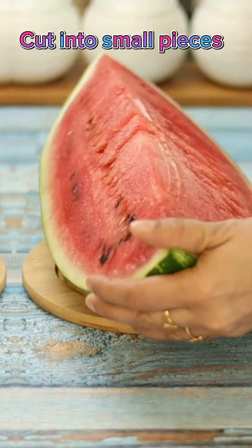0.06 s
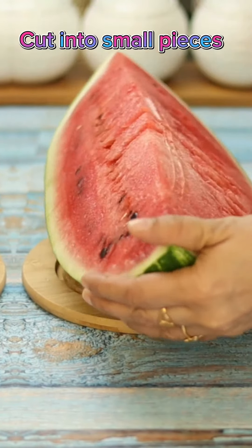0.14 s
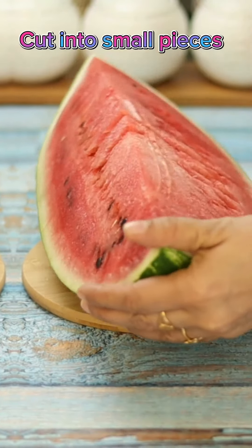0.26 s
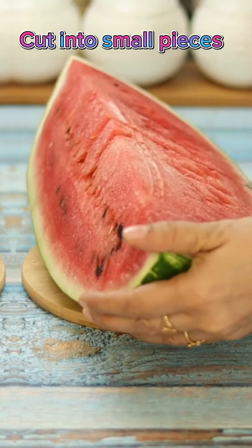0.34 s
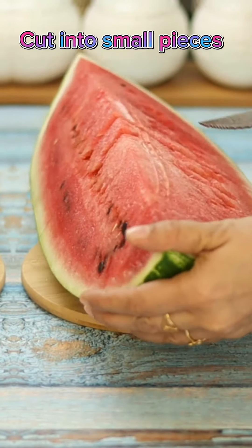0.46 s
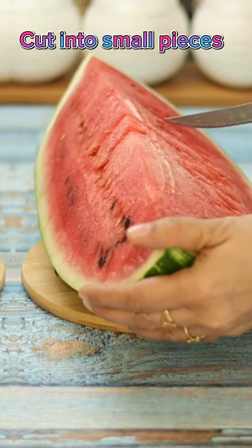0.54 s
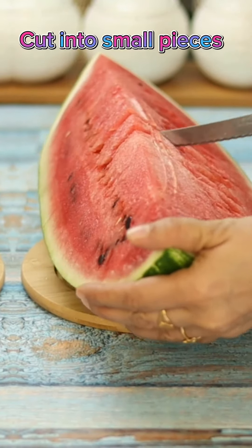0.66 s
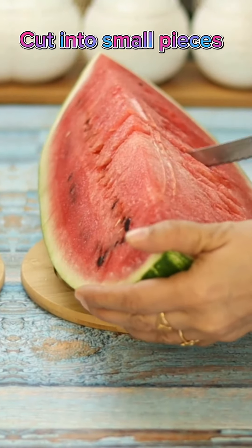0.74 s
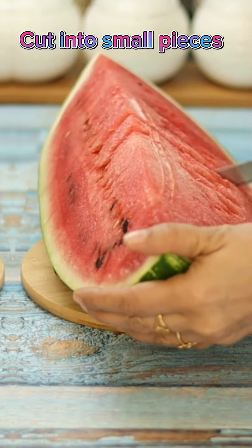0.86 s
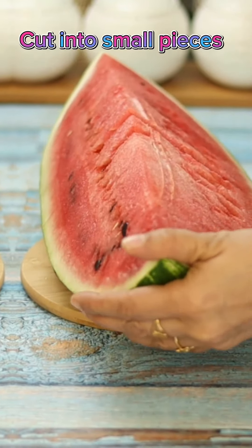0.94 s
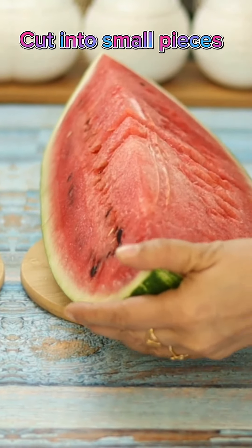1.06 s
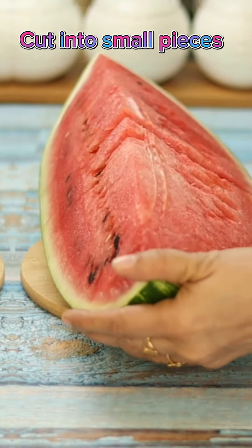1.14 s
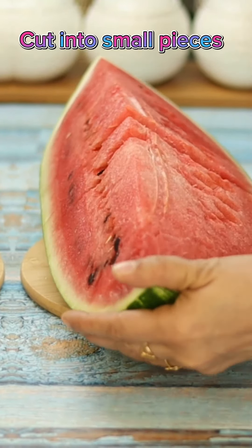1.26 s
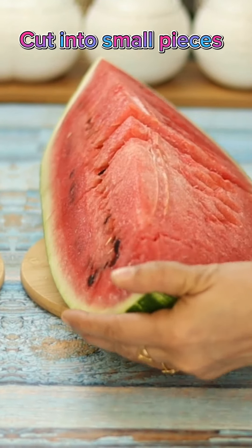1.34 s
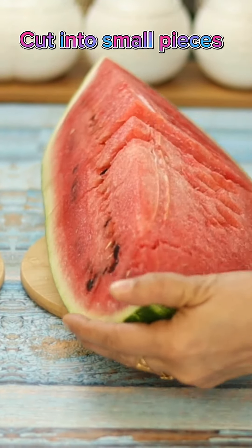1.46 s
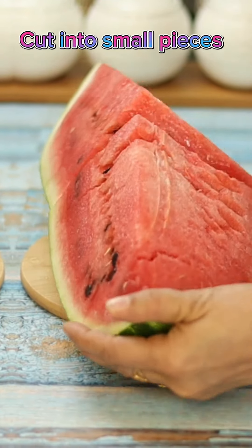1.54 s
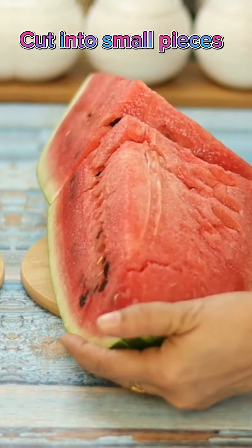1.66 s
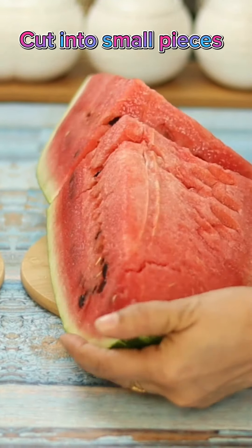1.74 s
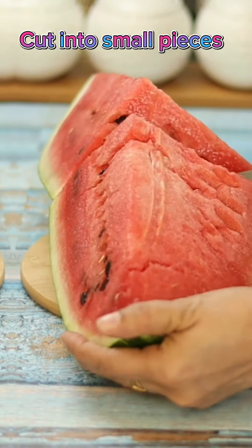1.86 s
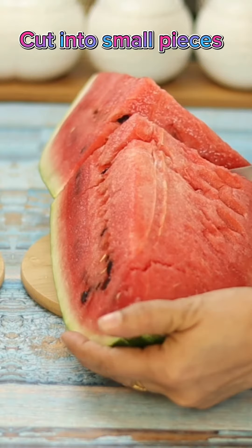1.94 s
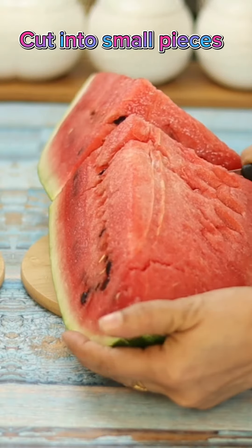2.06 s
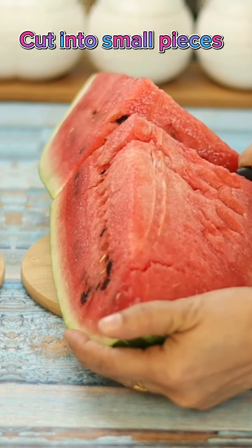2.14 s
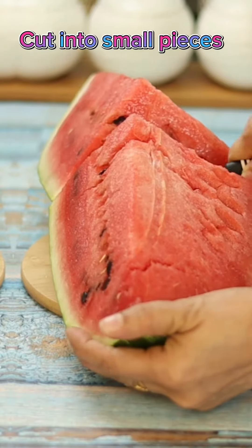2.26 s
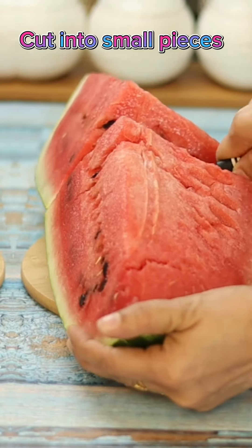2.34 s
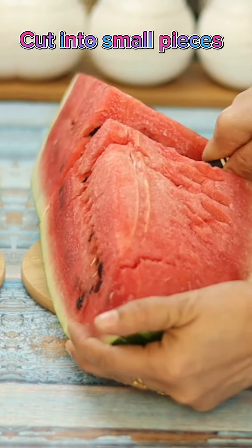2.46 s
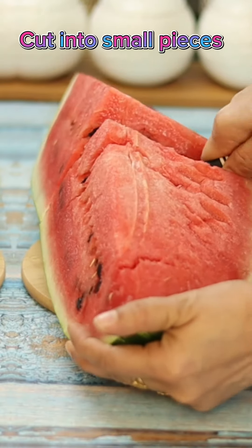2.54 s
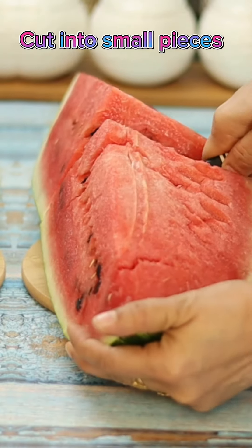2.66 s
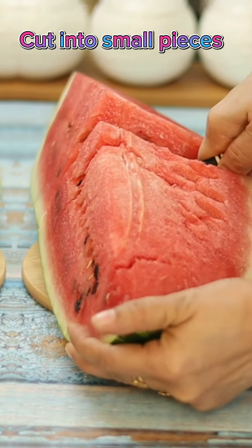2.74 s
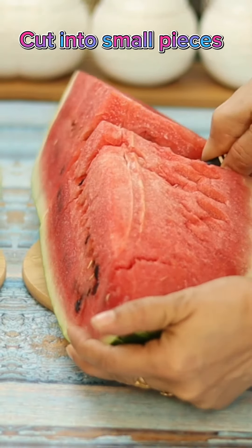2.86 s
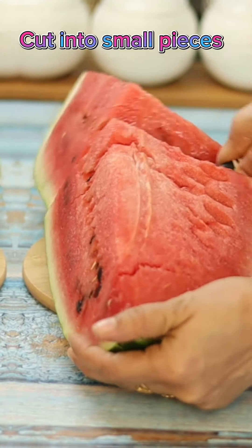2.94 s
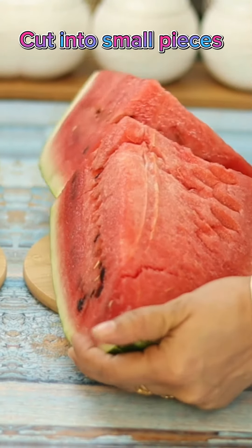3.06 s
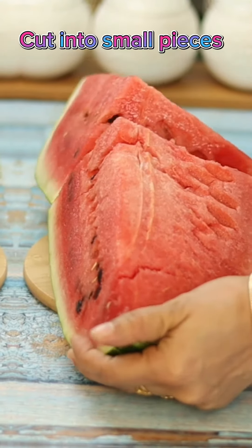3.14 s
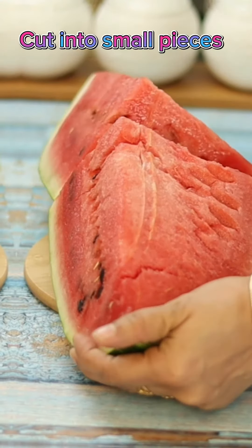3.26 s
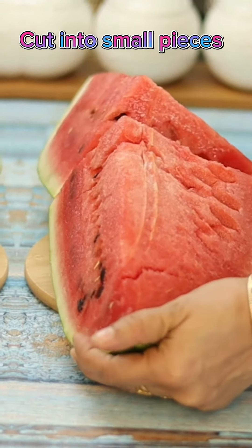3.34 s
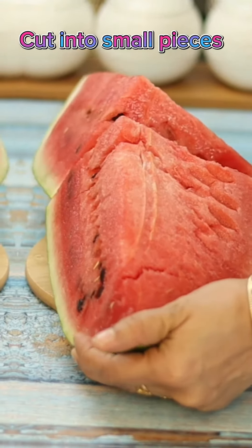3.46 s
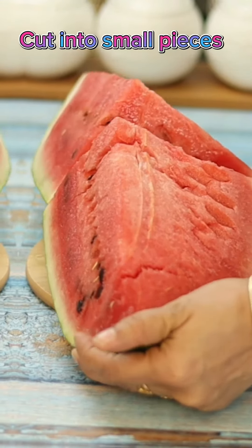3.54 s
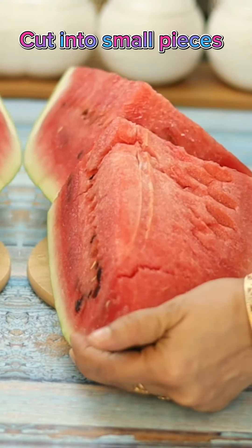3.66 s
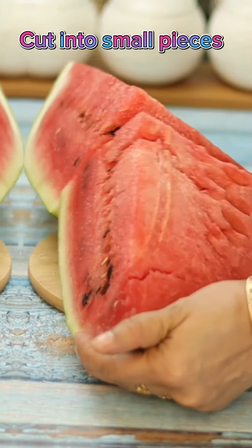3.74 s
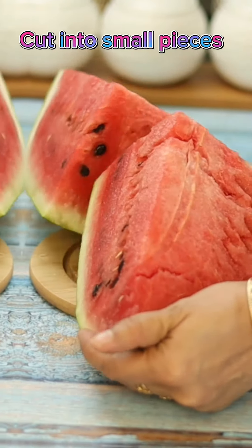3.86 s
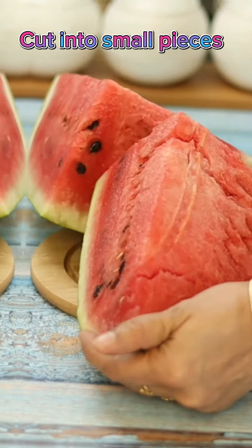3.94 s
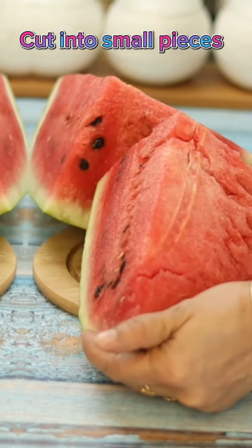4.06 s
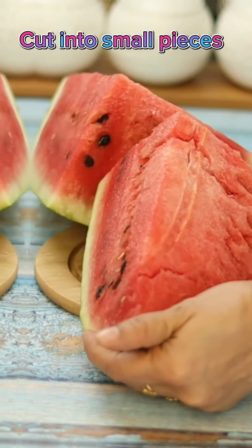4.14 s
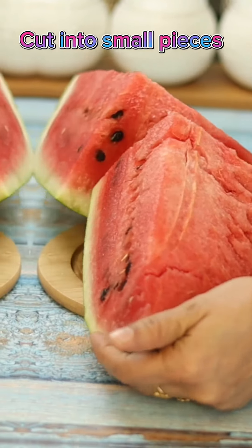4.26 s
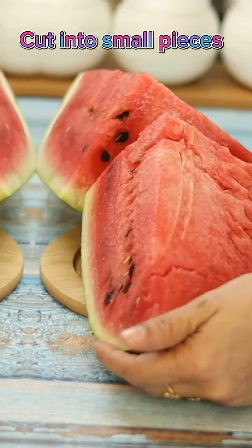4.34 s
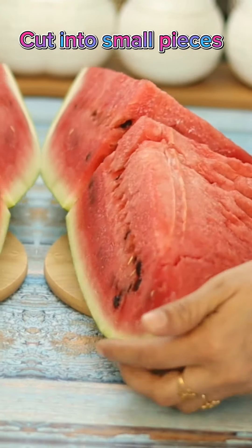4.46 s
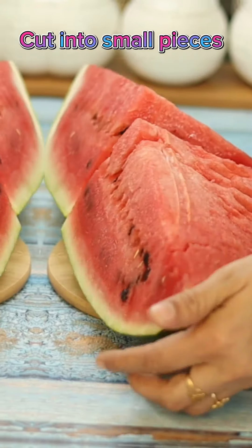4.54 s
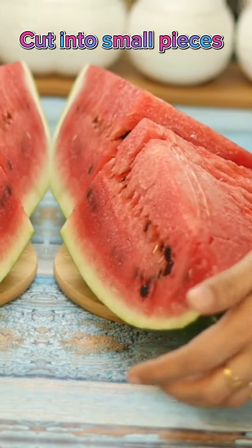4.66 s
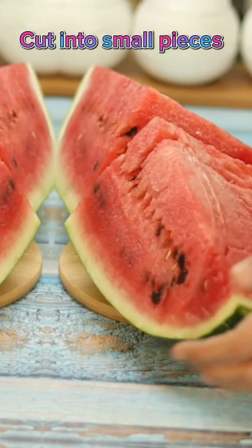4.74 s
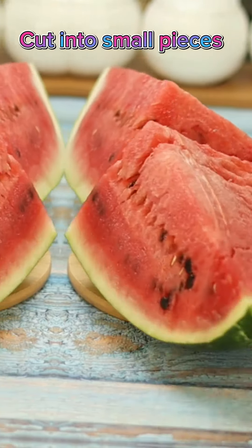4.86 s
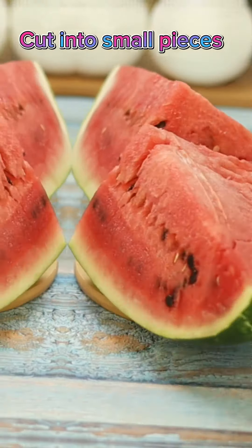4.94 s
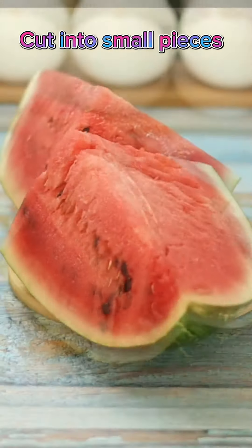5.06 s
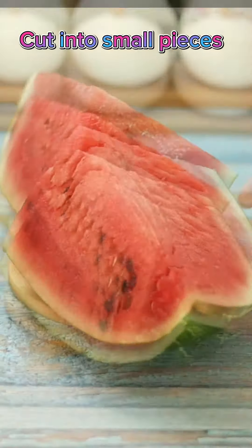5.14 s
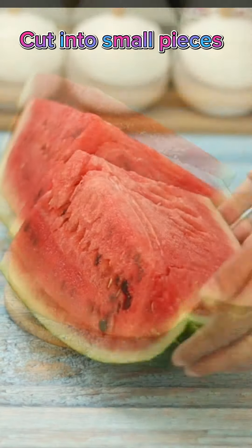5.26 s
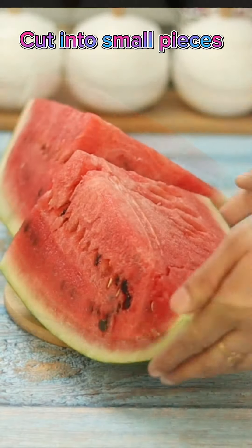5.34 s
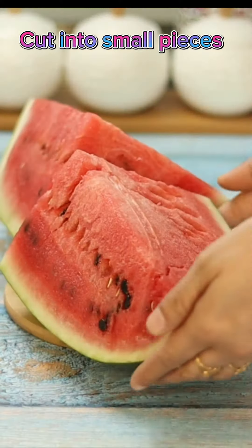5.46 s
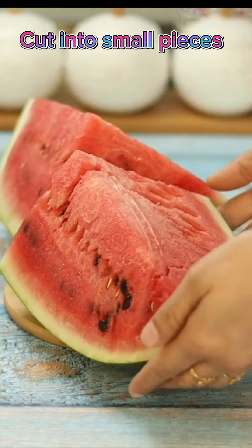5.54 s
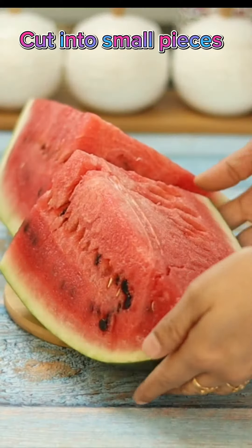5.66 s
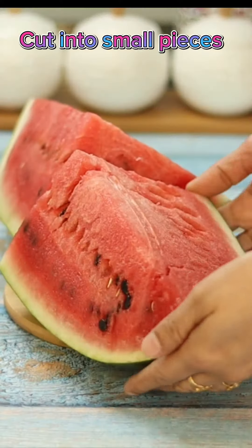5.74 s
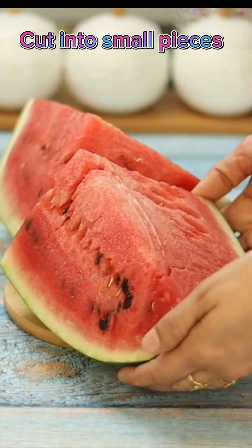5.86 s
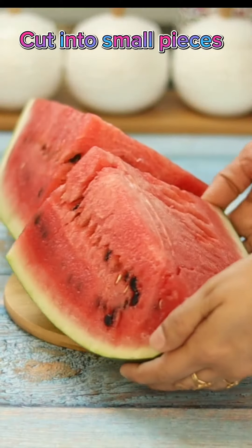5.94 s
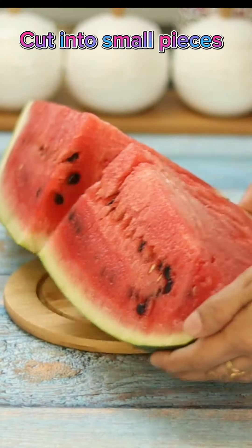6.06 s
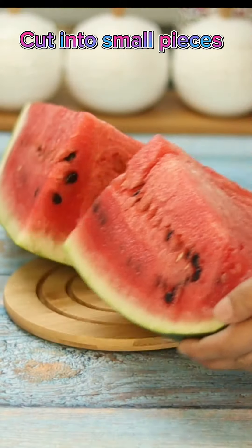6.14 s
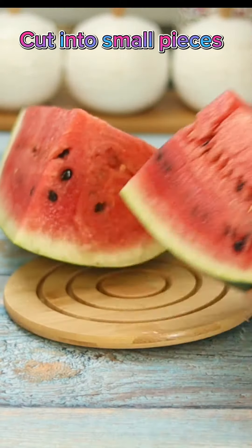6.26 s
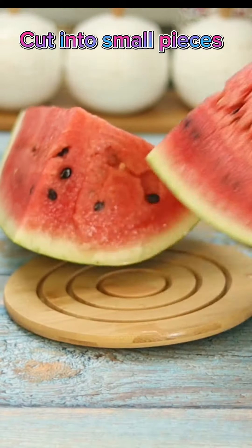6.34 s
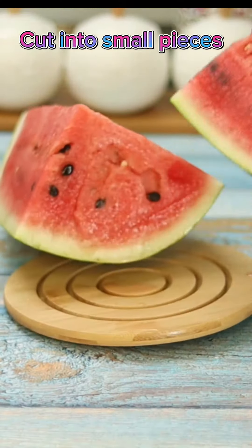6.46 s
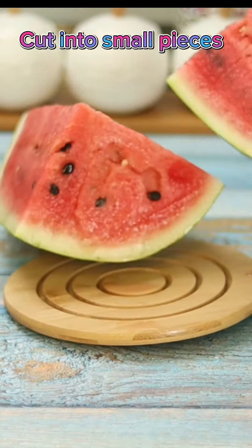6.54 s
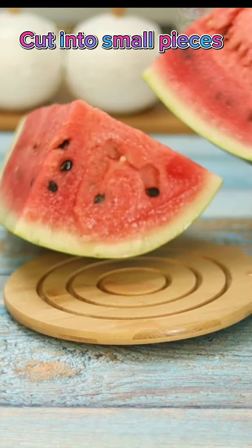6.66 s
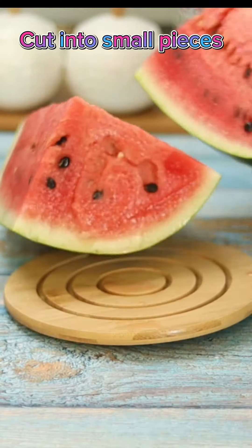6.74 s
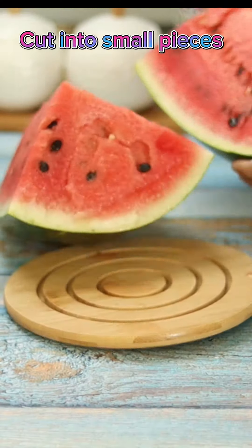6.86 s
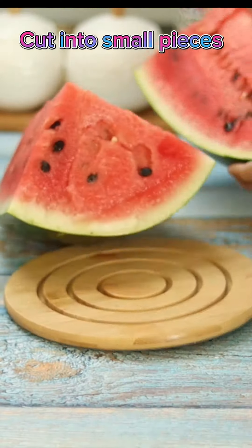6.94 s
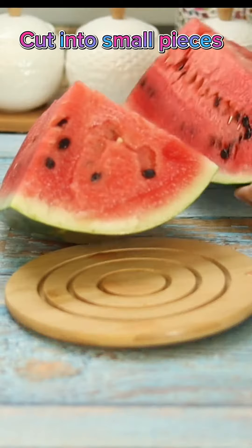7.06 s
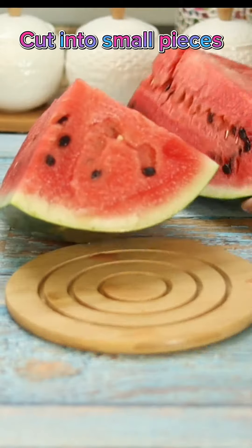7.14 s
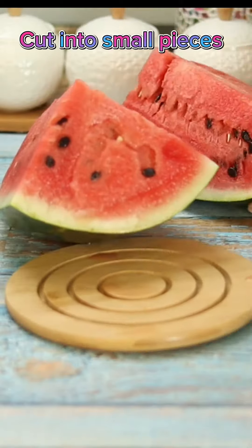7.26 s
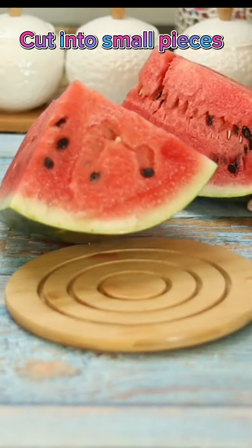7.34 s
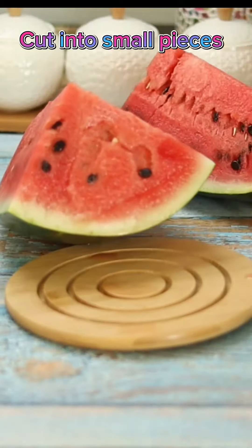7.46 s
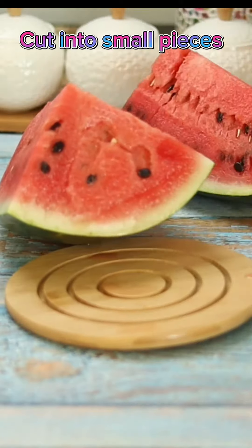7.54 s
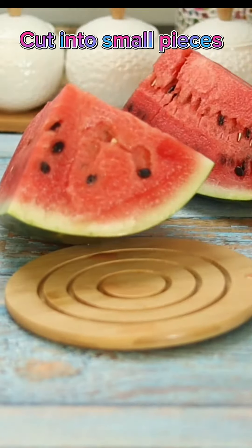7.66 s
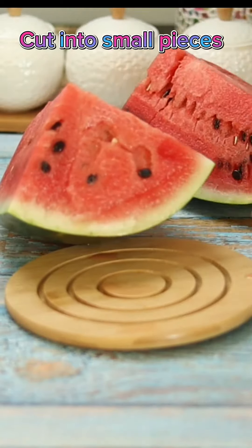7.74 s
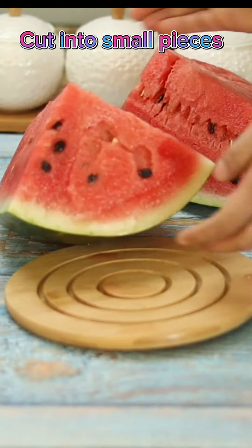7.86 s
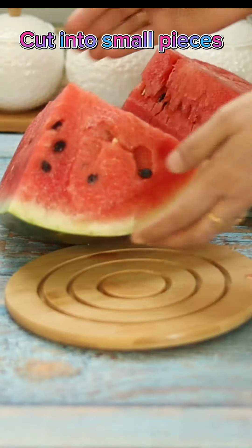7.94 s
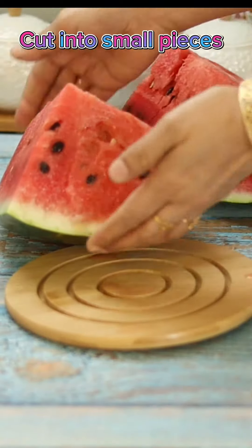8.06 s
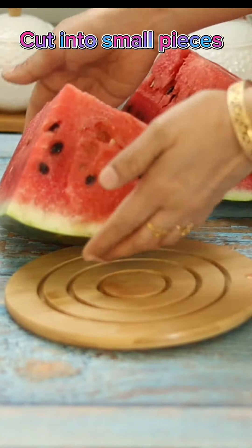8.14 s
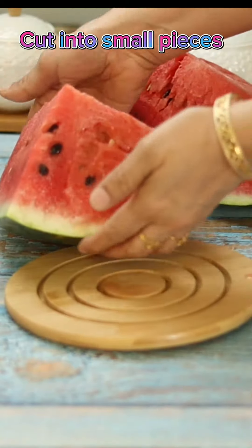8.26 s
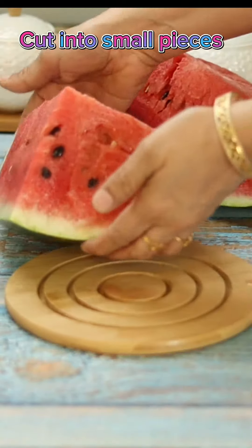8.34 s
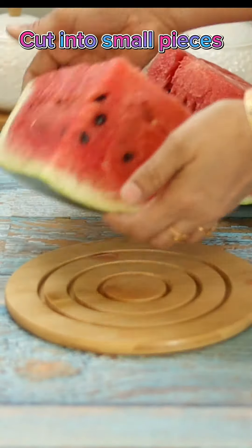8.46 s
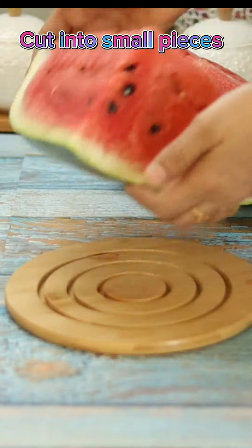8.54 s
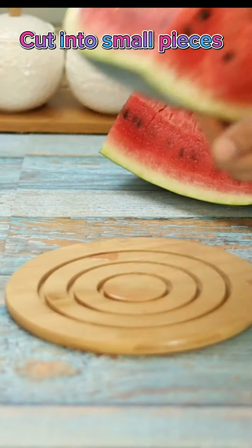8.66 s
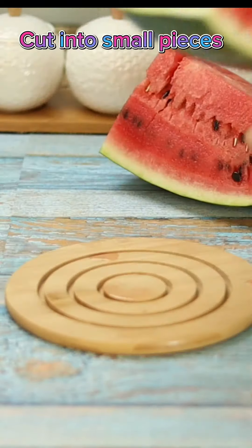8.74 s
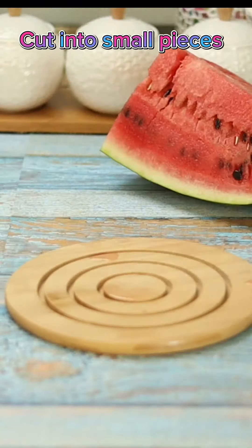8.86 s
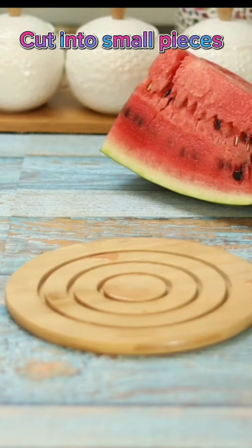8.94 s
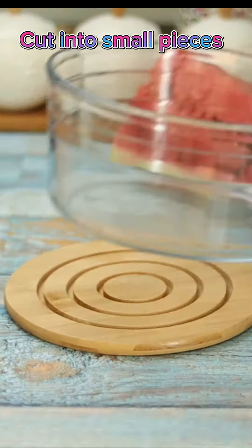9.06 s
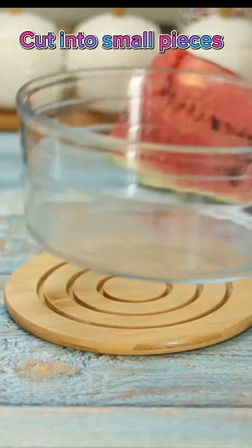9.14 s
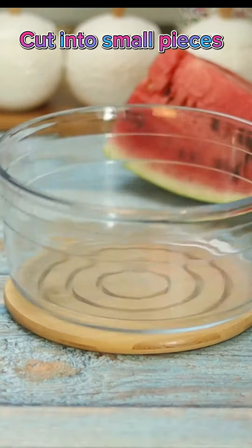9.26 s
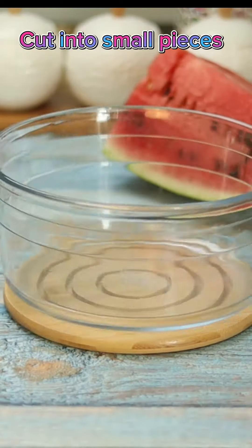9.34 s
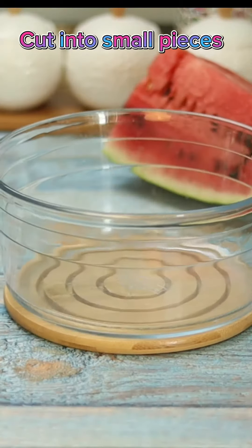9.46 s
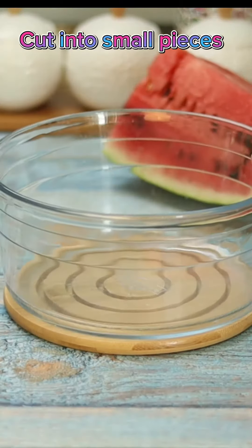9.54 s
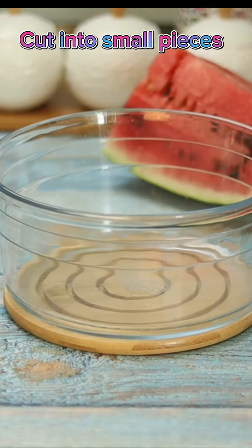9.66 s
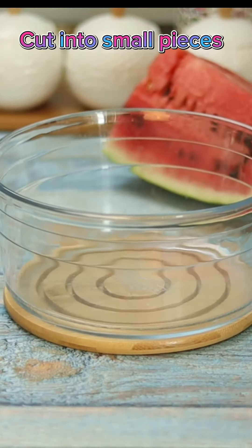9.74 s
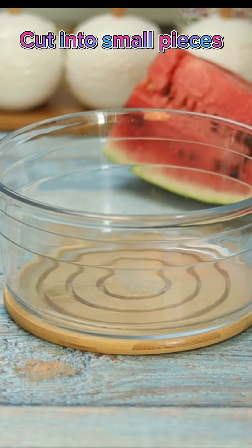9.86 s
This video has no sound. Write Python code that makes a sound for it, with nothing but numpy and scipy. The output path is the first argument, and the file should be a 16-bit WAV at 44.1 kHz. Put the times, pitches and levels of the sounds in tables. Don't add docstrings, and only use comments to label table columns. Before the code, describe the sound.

Close up in a hard, lively kitchen, a knife splits a watermelon with loud rind cracks and juicy crunches, then knocks hard on a wooden board with a short metallic ring. Quiet handling follows; a low electric hum mostly cuts out midway. Melon halves thud onto wood and table with a small squeak, and finally a heavy glass bowl lands with a sharp clank and rattles as it settles.

```python
import sys
import numpy as np
from scipy import signal
from scipy.fft import rfft, irfft, next_fast_len
from scipy.io import wavfile

SR = 44100
rng = np.random.default_rng(int(sys.argv[2]) if len(sys.argv) > 2 else 0)


def wav_out(sig):
    wavfile.write(sys.argv[1], SR, np.round(np.clip(np.atleast_2d(sig).T, -1, 1) * 32767).astype(np.int16))


def elevation(decibels):
    levels = np.asarray(decibels, float)
    return 10 ** (levels / 20)


N = 437031
TIME_S = np.arange(N) / SR
EDGES_HZ = 22 * 2 ** np.arange(0, 9.8, .5)
FLAT = [(20, 0), (20000, 0)]  # Hz, dB
DROP_OUT_S = 5.432
SILENCE = 1e-18

# start in seconds, crunch centre in Hz, fizz above 8 kHz in dB,
# trivet centre in Hz, lag of the left port in samples.
STROKES = [(0, 2300, -4.5, 303, 3), (0.045, 1956, -5, 302, 3), (.925, 2274, -5, 463.7, -3),
           (1.089, 3700, -5.5, 459.6, -3.5), (1.306, 2200, -5.5, 504.7, -2),
           (1.498, 2320, -4.5, 473.3, -1.5), (2.056, 2550, -1.5, 400, 4), (3.01, 2200, -1, 400, 3),
           (3.666, 2497, -4, 400, 2.5), (3.777, 2100, 0.5, 299, 3), (4.442, 4220, -7, 400, -5),
           (4.628, 3806, -1, 400, 4.5), (5.44, 3016, 0, 400, 10.5), (6.136, 2627, 9, 400, -1),
           (6.982, 1290, 0.5, 334, 3.5), (7.246, 1523, -2.5, 628.4, 3.5), (8.393, 1526, 2, 356.4, 2.5),
           (9.2702, 1800, -32.5, 514.6, -3.5)]
# peak in seconds, crunch in dB, time to swell by 20 dB
# in seconds, fall in dB per second, wet fizz over crunch in dB.
CUTS = [(.04, -24, 0.5, 496, -4.5), (.05, -21.5, 2, 179, -10.5), (0.369, -55.5, -17, 129, 5),
        (.92, -40.5, 0.09, 95, -4.5), (0.969, -31.5, 0, 128, -11), (1.115, -37.5, -2.5, 48, -7.5),
        (1.3, -40, -0.3, 199.5, 3), (1.337, -21.5, 0.3, 172.5, -3.5), (1.49, -32, 0, 292.5, -9),
        (1.51, -19.5, -2, 96, -9), (1.576, -17, -0.1, 346, -7.5), (1.7, -34.5, 0.3, 189.5, 3),
        (2.06, -47.5, -19, 90, -8), (2.252, -50.5, 0.2, 30.5, -1), (2.812, -52, 0.07, 150, -4),
        (3.017, -24.5, 14, 333, -11), (3.149, -40, 12, 269, -4.5), (3.65, -48, 0.08, 96.5, -2),
        (3.672, -34, 7, 130, -0.5), (3.761, -26, 0.2, 161.5, -7), (3.79, -30.5, 18, 218, 8),
        (.935, -38, -1.5, 65, -12), (1.16, -44.5, -4, 150, 1), (1.197, -42, 1, 200.5, -8),
        (1.265, -33.5, 0.1, 200, -3.5), (3.1, -45, 4.53, 68, -9.5)]
MOVES = [(4.447, -60, 0.056, 81, 12), (4.491, -54.5, .08, 40, -13.5), (4.645, -54, 0.066, 200, -9),
         (5.066, -46.5, 0.257, 49.4, -6.5), (5.421, -50, 0.53, 1200, -13), (6.138, -60, 0.046, 119, 1.5),
         (6.975, -50.5, 0.17, 100, -12), (7.085, -44.5, 1, 216, -24), (7.263, -24.5, 0.01, 133, -28),
         (7.3, -34.5, 0.033, 107.5, -44), (7.96, -56.5, 0.1, 29.6, -2), (8.396, -55, 0.062, 85, -34),
         (8.94, -58, 0.373, 99, -2.5), (9.3, -38.5, 0.34, 85.7, 1.5), (9.43, -23.5, 1, 140, -17)]
# peak in seconds, trivet in dB, table in dB, fall in dB per second.
ROCKS = [(0.0, -32, -28.5, 62.5), (0.052, -16.5, -29, 177), (.963, -36, -46, 105), (1.34, -22.5, -32, 125),
         (1.51, -27.5, -31, 53), (2.166, -47.5, -39.5, 80), (2.8, -44.5, -36.5, 94),
         (3.015, -26.5, -30.5, 130), (3.723, -30, -41, 60), (3.79, -19, -16.5, 119), (5.75, -67, -44, 50),
         (6.14, -43.5, -56.5, 49.5), (6.32, -39, -35, 85.5), (6.729, -40, -62, 62.5),
         (6.965, -43.5, -25.5, 94), (6.986, -11.5, -14.5, 160), (7.18, -41, -27, 60),
         (7.263, -15.5, -4.5, 102), (7.37, -25.5, -35, 153), (7.57, -39.5, -33, 143),
         (8.396, -18.5, -44, 163), (8.52, -32, -36, 193), (8.937, -37.5, -61, 503.5),
         (9.184, -45.5, -55, 300), (9.28, -21, -22.5, 46), (9.431, -18.5, -23, 141), (9.56, -42, -33, 89.5)]
# crunch, fizz, trivet, table, all in dB.
REST_DB = [(-72.5, -66.5, -51, -49), (-68.5, -76.5, -63.5, -55)]
# centre in Hz, width in Hz, level in dB.
FLESH_MODES = [(807, 200, -2), (1110, 210, 4.5), (1566, 280, 5), (2100, 560, 1.5), (2540, 405, 2.5),
               (3260, 840, -1), (4130, 1300, -8.5), (5730, 600, -11.5)]
# frequency in Hz, level in dB per Hz.
FIZZ_SPECTRUM = [(2500, -7), (3800, -3.5), (5500, -5), (8000, -7.5), (11000, -4.5), (13000, -11),
                 (15000, -39)]
# centre in Hz, width in Hz, level in dB.
TRIVET_MODES = [(234, 80, 1), (297, 86.3, -0.5), (400, 27, -6.5), (564, 171, -6.5), (632, 139, -3),
                (748.2, 69, -6), (920, 100, -15)]
# centre in Hz, width in Hz, level in dB.
TABLE_MODES = [(41, 6.7, -32), (56.4, 5, -11.5), (68, 9.3, -10.5), (106.9, 6.9, 1.5), (140, 9, -2.5),
               (178, 29, -10.5)]
# time in seconds, peak in dB, ring in Hz, edge over peak in dB.
SNAPS = [(0.0505, -4.5, 1810, -33.5), (0.0588, -6, 1708, -31), (0.7336, -40.5, 3560, -2.5),
         (0.9604, -28.5, 1710, -22.5), (1.1073, -28.5, 2900, -15.5), (1.2617, -24, 1910, -26),
         (1.3065, -12, 3220, -32.5), (1.33, -11, 2450, -33), (1.3644, -11.5, 3130, -28),
         (1.5016, -10.5, 2550, -29), (1.54, -10.5, 2460, -21.5), (1.5788, -9, 2730, -26.5),
         (1.6929, -17.5, 3800, -7), (3.0093, -18, 1880, -15.5), (3.018, -19.5, 1380, -21),
         (3.6658, -20.5, 2480, -18.5), (3.7414, -23, 2100, -8.5), (4.4457, -38, 5800, -22),
         (6.133, -30, 1800, -3.5), (6.979, -22, 1330, -35), (7.251, -30, 1503, -36),
         (7.2715, -32, 1150, -28), (7.2985, -27, 1000, -34), (7.513, -31.5, 2140, -32),
         (7.5542, -36.5, 2500, -32), (7.5646, -31.5, 1680, -33), (7.8426, -39.5, 5000, -0.5),
         (8.3922, -33, 1380, -28.5), (8.591, -36.5, 1900, -30), (9.1094, -35.5, 2150, -32)]
# time in seconds, level in dB, decay in seconds.
CRACKS = [(0.0443, -5, 0.0046), (1.571, -22, 0.00048), (3.6661, -19.5, .001), (3.6706, -22, .001),
          (3.6737, -23, .001), (3.741, -19, .001), (3.7483, -19, .001), (3.7766, -8.5, 0.0017),
          (3.7835, -10, 0.003), (9.2704, 4, 0.0026), (9.2877, 2.5, 0.002), (9.2928, -14.5, 0.0027)]
# centre in Hz, width in Hz, level in dB.
CRACK_MODES = [(1200, 354, -0.5), (1800, 980, 1.5), (2610, 1570, 3), (3740, 2570, -4), (6100, 1800, -15)]
# time in seconds, peak in dB, centre in Hz.
TICKS = [(.0029, -27, 7000), (.0226, -23.5, 7000), (0.3667, -33, 5900), (.9316, -30, 3700),
         (0.9594, -22, 1900), (1.1582, -39.5, 2900), (1.1658, -39, 5800), (1.1955, -30.5, 5800),
         (1.2319, -30.5, 5800), (1.2624, -24, 4500), (1.3081, -9, 3370), (1.312, -9, 3600),
         (1.317, -16, 4000), (1.3276, -8, 2700), (1.333, -15, 4000), (1.3715, -14.5, 3500),
         (1.4982, -11, 2800), (1.502, -7.5, 2500), (1.5067, -12, 3000), (1.5236, -17, 4500),
         (1.538, 0, 2500), (1.5427, -12, 3500), (1.5714, -0.5, 2700), (1.5791, -15, 4520),
         (1.5974, -20, 3500), (1.701, -16, 5000), (1.703, -13, 6030), (2.0765, -44.5, 7000),
         (2.3821, -36, 7000), (2.5114, -37, 7000), (2.9979, -37.5, 3000), (3.0104, -8.5, 2600),
         (3.0152, -19, 2500), (3.0187, -15.5, 3000), (3.019, -22.5, 7000), (3.6853, -26.5, 8020),
         (3.7069, -19, 7000), (3.7146, -21.5, 6980), (3.7605, -22, 8000), (3.7705, -18.5, 7010),
         (3.7771, -2, 8520), (3.781, -4.5, 7527), (3.7833, -2.5, 7950), (3.7858, -9.5, 8000),
         (3.788, -5.5, 7950), (6.9485, -39.5, 7000), (7.2597, -30, 4500), (7.2699, -17, 3520),
         (7.3022, -19, 3000), (9.2723, -4, 4480), (9.2876, -4.5, 5520), (9.2951, -8, 2500),
         (9.2968, -7.5, 3200), (9.298, -10.5, 2500), (9.304, -10.5, 2170), (9.4219, -9, 2800)]
# time in seconds, level in dB.
SPLIT = [(.043, -30.5), (.046, -7), (.06, -6.5), (.08, -17.5), (.12, -19), (.15, -28.5), (.3, -45.5)]
# centre in Hz, width in Hz, level in dB.
RIND_MODES = [(1180, 160, -2), (1600, 250, 0), (1950, 300, 0), (2400, 450, 0), (3875, 700, -11)]
# time in seconds, level in dB.
DRAGS = [
    [(1.09, -58.5), (1.11, -42), (1.15, -40), (1.17, -35.5), (1.19, -36), (1.2, -36), (1.255, -36),
     (1.265, -28), (1.305, -29)],
    [(4.622, -63), (4.635, -38), (4.67, -42), (4.71, -55)],
]
# centre in Hz, width in Hz, level in dB.
RASP_MODES = [(2700, 560, -5), (3370, 700, -1.5), (5690, 660, -8)]
# centre in Hz, width in Hz, level in dB.
SLIP_MODES = [(2920, 400, -2.5), (3500, 370, 1.5), (4300, 900, -4.5)]
# time in seconds, level in dB.
PEELING = [(4.437, -59), (4.448, -40), (4.465, -50), (4.49, -51), (4.56, -54.5), (4.585, -66)]
# centre in Hz, width in Hz, level in dB.
PEEL_MODES = [(4280, 500, -6), (5900, 500, -1.5), (6820, 610, -1.5)]
# time in seconds, peak in dB, trivet over peak in dB.
THUDS = [
    (0.048, -39.5, -6),
    (3.768, -22, -16),
    (6.956, -21.5, -11.5),
    (6.976, -22, 0),
    (7.243, -17.5, -28),
    (7.271, -14, -7),
    (8.397, -16.5, -34),
    (9.274, -34.5, -13),
    (9.425, -39, 21),
]
# time in seconds, level in dB.
DROPS = [
    [(6.978, -40), (6.985, -23), (7.02, -28), (7.1, -42)],
    [(7.243, -32), (7.26, -16), (7.285, -11), (7.33, -20.5), (7.4, -30), (7.5, -35.5), (7.56, -38),
     (7.62, -55)],
    [(8.392, -50), (8.398, -32), (8.45, -51), (8.55, -55)],
]
# centre in Hz, width in Hz, level in dB.
WOOD_MODES = [(543, 144, 0.5), (680, 125, -1), (1060, 240, -9.5), (1800, 570, -13.5), (2500, 480, -14.5),
              (4700, 870, -27.5)]
# time in seconds, pitch in Hz, level in dB.
SQUEAK = [(7.03, 273.5, -49), (7.05, 261, -30), (7.08, 347, -27), (7.11, 393, -26), (7.125, 350, -34),
          (7.14, 360, -50)]
# frequency in Hz, level in dB, t60 in seconds.
BLADE_RING = [(1036, -10.5, 0.12), (1330, -5, 0.12), (1880, -13, 0.44), (1973, -9.5, 0.45),
              (2040, -11, 0.5), (2140, -13.5, 0.42), (3090, -15, 0.13), (3220, -16, 0.128), (4730, -15, .1)]
# time in seconds, level in dB.
BLADE_HITS = [
    (3.776, -18.5),
    (3.784, -23),
]
# centre in Hz, width in Hz, level in dB.
BLADE_MODES = [(1046, 98, -4), (1340, 180, -2.5), (1997, 170, 0.5), (3080, 340, -3.5), (3830, 360, -11),
               (4640, 300, -5.5), (5020, 200, -4.5), (6635, 600, -11)]
# time in seconds, level in dB.
BLADE_SHAKE = [(3.7755, -31.5), (3.777, -1.5), (3.7825, -25), (3.7845, -3), (3.792, -13.5), (3.82, -20),
               (3.9, -32.5), (4.02, -53)]
# frequency in Hz, level in dB, t60 in seconds.
BOWL_RING = [(789, -13, 0.38), (840, -22.5, 0.48), (1039, -2, 0.23), (1150, -1, 0.16), (1310, -20.5, 0.16),
             (2170, -15, 0.33), (2670, -3.5, 0.06), (2960, -13.5, 0.2), (3400, -10, .4),
             (3440, -12.5, 0.46), (3700, -7, 0.097), (4250, -17, 0.14)]
# time in seconds, level in dB.
BOWL_HITS = [
    (9.27, -17),
    (9.288, -25),
    (9.422, -26.5),
]
# centre in Hz, width in Hz, level in dB.
BOWL_MODES = [(334, 94, -8.5), (705, 170, -4.5), (830, 71, 1), (1000, 76, 0.5), (1330, 150, -4.5),
              (1810, 130, -2), (2114, 94, -0.5), (2650, 220, -5), (3000, 110, -4.5), (3401, 40, -7.5),
              (3640, 100, -8), (4270, 500, -16.5), (4930, 370, -14.5), (5800, 470, -22.5), (6800, 640, -21)]
# time in seconds, level in dB.
BOWL_SHAKE = [(9.27, -34), (9.29, -15.5), (9.31, -16.5), (9.38, -14.5), (9.425, -11.5), (9.45, -16),
              (9.47, -22.5), (9.6, -39), (9.72, -60)]
# time in seconds, level in dB.
RUSTLE = [(8.97, -56), (9.06, -46), (9.13, -56)]
# frequency in Hz, level in dB.
HUM_ON = [(102.3, -50.5), (150.7, -58), (199.2, -44.5), (247.6, -54), (301.5, -48), (339.1, -61.5),
          (398.4, -53.5), (489.9, -61.5), (549, -65.5), (597.5, -62.5), (700, -70.5), (1082, -65.5),
          (1130, -64.5)]
# frequency in Hz, level in dB.
HUM_OFF = [(96.9, -57.5), (150.7, -55), (339.1, -70)]
# time in seconds, pitch in Hz, level in dB.
WHINE = [(8.55, 1290, -73), (8.7, 1312, -59), (8.95, 1366, -76.5), (9.15, 1370, -62), (9.27, 1434, -79.5)]
# frequency in Hz, level in dB per Hz.
AIR_ON = [(20, -22.5), (80, -19.5), (211, -9), (457, -17), (1000, -19.5), (1350, -22.5), (11100, -42),
          (15000, -88)]
# frequency in Hz, level in dB per Hz.
AIR_OFF = [(20, -42.5), (43, -9), (110, -16.5), (165, -7.5), (500, -14), (1460, -19.5), (9900, -34.5),
           (15000, -44)]
AIR_ON_DB, AIR_OFF_DB = -45, -46.5
# frequency in Hz, t60 in seconds.
KITCHEN_T60 = [(60, 1), (250, 0.29), (1000, 0.56), (3000, 0.49), (7000, 0.38), (14000, 0.3)]
# frequency in Hz, side over mid in dB.
SIDE_DB = [(30, -26.5), (60, -33.5), (125, -10.5), (250, -1.5), (500, 3), (1000, 3), (2000, 5),
           (14000, 8.5)]
# from in seconds, to in seconds, above in Hz.
STARVED = [
    (7.285, 7.49, 7400),
    (9.3, 9.6, 8350),
]


def rms_one(x):
    return x / np.sqrt(np.mean(x ** 2) + 1e-20)


def at_hz(points, hz):
    points = np.array(points)
    return np.interp(np.log(hz), np.log(points[:, 0]), points[:, 1])


def drift(rate):
    r = np.exp(-80 * np.pi * rate / SR)
    slow = signal.lfilter([1], [1, -2 * r, r * r], rng.standard_normal(N // 40 + 2002))[2000:]
    return np.interp(np.arange(N) / 40, np.arange(len(slow)), rms_one(slow - slow.mean()))


def resonate(x, hz, width_hz):
    r = np.exp(-np.pi * width_hz / SR)
    poles = [1, -2 * r * np.cos(2 * np.pi * hz / SR), r * r]
    return signal.lfilter([(1 - r * r) / 2, 0, (r * r - 1) / 2], poles, x)


def body(x, modes):
    return sum((-1) ** k * elevation(db) * resonate(x, hz, w) for k, (hz, w, db) in enumerate(modes))


def per_stroke():
    rows = np.array(STROKES)
    stroke = np.clip(np.searchsorted(rows[:, 0], TIME_S) - 1, 0, None)
    return rows[stroke, 1:].T


def focused(x, modes, centre_hz, slope_db):
    centres, stroke = np.unique(centre_hz, return_inverse=True)
    out = 0
    for k, (hz, width_hz, db) in enumerate(modes):
        gain = elevation(db - slope_db * np.log2(hz / centres) ** 2)[stroke]
        out = out + (-1) ** k * gain * resonate(x, hz, width_hz)
    return rms_one(out)


def swells(rows, rest_db):
    t, starts = TIME_S[::32], np.array(STROKES)[:, 0]
    s, db, swell_s, fall = np.transpose(rows)[:, :, None]
    begun = t >= starts[np.searchsorted(starts, s, side="right") - 1]
    rise_db = 20 * (s - t) / np.maximum(swell_s, 1e-3)
    level = db - np.where(t < s, rise_db, np.abs(fall) * (t - s))
    power = np.sum(begun * elevation(2 * level), axis=0) + elevation(2 * np.where(t < DROP_OUT_S, *rest_db))
    return np.interp(TIME_S, t, 10 * np.log10(power))


def uneven(n, spread_db):
    return elevation(spread_db * np.minimum(rng.exponential(1, n), 5)) * rng.choice([-1, 1], n)


def grains(per_s, spread_db):
    return uneven(N, spread_db) * (rng.random(N) < per_s / SR) + SILENCE


def crunch(rest_db):
    level_db = swells([row[:4] for row in CUTS + MOVES], rest_db)
    cells = focused(grains(2500.0, spread_db=1.5), FLESH_MODES, per_stroke()[0], slope_db=4.5)
    return cells * elevation(np.minimum(level_db - 5.0, -19) + 1.9 * drift(30.0))


def fizz(rest_db):
    level_db = swells([(s, db + wet, up, down) for s, db, up, down, wet in CUTS + MOVES], rest_db)
    size = next_fast_len(N)
    hz = np.maximum(np.fft.rfftfreq(size, 1 / SR), 1)
    cells = rfft(grains(6000.0, spread_db=0.5), size) * elevation(at_hz(FIZZ_SPECTRUM, hz))
    low = irfft(cells / (1 + (hz / 8300) ** 16), size)[:N]
    high = irfft(cells / (1 + (8300 / hz) ** 16), size)[:N]
    return rms_one(low + elevation(per_stroke()[1]) * high) * elevation(level_db - 0.5 + 1.73 * drift(27.0))


def rocking(trivet_rest_db, table_rest_db):
    swell_s, table_fall_share = 0.079, 0.96
    trivet_db = swells([(s, db, swell_s, down) for s, db, _, down in ROCKS], trivet_rest_db)
    table_db = swells([(s, db, swell_s, table_fall_share * down) for s, _, db, down in ROCKS], table_rest_db)
    trivet = focused(rng.standard_normal(N), TRIVET_MODES, per_stroke()[2], slope_db=4.0)
    table = rms_one(body(rng.standard_normal(N), TABLE_MODES))
    return trivet * elevation(trivet_db - 8.0) + table * elevation(table_db - 8.5)


def handling():
    crunch_rest, fizz_rest, trivet_rest, table_rest = np.transpose(REST_DB)
    return crunch(crunch_rest) + fizz(fizz_rest) + rocking(trivet_rest, table_rest)


def snaps():
    size = 1500
    out, t = np.zeros(N + 2000), np.arange(size) / SR
    for s, db, hz, edge_db in SNAPS:
        hiss = rng.standard_normal(size)
        hard = np.clip((db + 40.0) / 69.0, 0, 1)
        stretch = 1 + 3.4 * (1 - hard)
        pulse = hard * np.sin(2 * np.pi * hz * t) * np.exp(-t * hz / 5.0)
        burst = hiss * np.exp(-t / (0.0019 * stretch))
        shake = 1.3 * resonate(burst, hz, 0.42 * hz) + 0.5 * body(burst, FLESH_MODES)
        edge = 0.8 * elevation(edge_db) * np.diff(hiss, n=2, prepend=[0, 0]) * np.exp(-t / (0.00075 * stretch))
        at = round(s * SR)
        out[at:at + size] += elevation(db + 3.0) * (pulse + (shake + edge) / np.sqrt(stretch))
    return out[:N]


def cracks():
    drive, noise, t = np.full(N, SILENCE), rng.standard_normal(N), TIME_S[:4000]
    for s, db, decay_s in CRACKS:
        at = round(s * SR)
        drive[at:at + len(t)] += elevation(db) * np.exp(-t / max(decay_s, 1e-4))
        noise[at] = 4.1
    return 2.85 * body(drive * noise, CRACK_MODES)


def ticks():
    out = np.zeros(N)
    for s, db, hz in TICKS:
        turns = TIME_S[:200] * hz
        swing = np.sin(2 * np.pi * turns) * turns * np.exp(-turns / 0.49)
        at = round(s * SR) - 4
        out[at:at + 200] += elevation(db) * swing / np.max(np.abs(swing))
    return signal.sosfilt(signal.butter(2, 400, "high", fs=SR, output="sos"), out + SILENCE)


def shaken(rows, modes, spread_db):
    out, (s, db) = np.zeros(N), np.transpose(rows)
    a, b = round(s[0] * SR), round(s[-1] * SR) + 4000
    contacts = uneven(SR, spread_db) * (rng.random(SR) < 5000.0 / SR)
    drive = rms_one(contacts)[:b - a] * elevation(np.interp(TIME_S[a:b], s, db, right=-200))
    out[a:b] = 2.1 * body(drive + SILENCE, modes)
    return out


def rind_and_skin():
    out = shaken(SPLIT, RIND_MODES, spread_db=1.0)
    modes = (RASP_MODES, SLIP_MODES, PEEL_MODES, PEEL_MODES[:1])
    for rows, surface in zip(DRAGS + [PEELING, RUSTLE], modes):
        out = out + shaken(rows, surface, spread_db=4.5)
    return out


def dropped_halves():
    return sum(shaken(rows, WOOD_MODES, spread_db=1.5) for rows in DROPS)


def thuds():
    low, mid = np.full((2, N), SILENCE)
    for s, db, trivet_db in THUDS:
        low[round(s * SR)] = elevation(db)
        mid[round(s * SR)] = elevation(db + trivet_db)
    soft = signal.butter(2, 1200.0, fs=SR, output="sos")
    return signal.sosfilt(soft, elevation(48.0) * body(low, TABLE_MODES) + elevation(32.0) * body(mid, TRIVET_MODES))


def glide(rows, flutter_db, wobble_hz):
    s, hz, db = np.transpose(rows)
    pitch_hz, level_db = np.interp(TIME_S, s, hz), np.interp(TIME_S, s, db)
    gate = (TIME_S > s[0]) * (TIME_S < s[-1]) * elevation(level_db + flutter_db * drift(53.0))
    return gate * np.sin(2 * np.pi * np.cumsum(pitch_hz + wobble_hz * drift(24.0)) / SR)


def squeak():
    return glide(SQUEAK, flutter_db=-3.5, wobble_hz=9.8)


def struck(hits, modes):
    out, at = 0, [round(s * SR) for s, _ in hits]
    for hz, db, t60_s in modes:
        clicks, r, w = np.full(N, SILENCE), elevation(-60 / (t60_s * SR)), 2 * np.pi * hz / SR
        clicks[at] = elevation(np.array(hits)[:, 1] + db + rng.normal(0, 1.0, len(at)))
        out = out + signal.lfilter([0, np.sin(w)], [1, -2 * r * np.cos(w), r * r], clicks)
    return out


def chatter():
    blade = shaken(BLADE_SHAKE, BLADE_MODES, spread_db=2.0)
    return blade + shaken(BOWL_SHAKE, BOWL_MODES, spread_db=3.5)


def hum():
    on = np.clip((DROP_OUT_S - TIME_S) / .004, 0, 1)
    clock_s = TIME_S + .00008 * drift(5.7)
    lines = [(hz, db, 1 - on) for hz, db in HUM_OFF]
    for hz, db in HUM_ON:
        multiple = round(hz / 50)
        locked = abs(hz / 50 - multiple) < .1
        lines.append((50 * multiple if locked else hz, db, on))
    out = 0
    for hz, db, gate in lines:
        turns = hz * clock_s + 0.018 * drift(3.0)
        out = out + gate * elevation(db + 1.0 + 1.5 * drift(2.0)) * np.cos(2 * np.pi * turns)
    return out


def whine():
    return glide(WHINE, flutter_db=2.0, wobble_hz=9.1)


def bands(x):
    for k, (low, high) in enumerate(zip(EDGES_HZ, EDGES_HZ[1:])):
        band = signal.butter(2, [low, high], "band", fs=SR, output="sos")
        yield np.sqrt(low * high), signal.sosfilt(band, x[k % 2])


def spread(hz, mid, side):
    share = elevation(at_hz(SIDE_DB, hz))
    return (mid + share * side * [[1], [-1]]) / np.sqrt(1 + share ** 2)


def noise_rms(spectrum):
    power = sum(elevation(at_hz(spectrum, lo * 2 ** .25)) ** 2 * lo * .414 / SR * 4 for lo in EDGES_HZ[:-1])
    return np.sqrt(power)


def air():
    out, on_rms, off_rms = 0, noise_rms(AIR_ON), noise_rms(AIR_OFF)
    for hz, (mid, side) in bands(rng.standard_normal((2, 2, N))):
        on_gain = elevation(at_hz(AIR_ON, hz) + AIR_ON_DB) / on_rms
        off_gain = elevation(at_hz(AIR_OFF, hz) + AIR_OFF_DB) / off_rms
        gain = np.where(TIME_S < DROP_OUT_S, on_gain, off_gain)
        out = out + gain * elevation(0.59 * drift(4.0)) * spread(hz, mid, side)
    return out


def kitchen(x):
    t, echo = TIME_S[:SR], 0
    for hz, (mid, side) in bands(rng.standard_normal((2, 2, SR))):
        echo = echo + spread(hz, mid, side) * elevation(-60 * t / at_hz(KITCHEN_T60, hz))
    echo = echo * np.clip((t - .006) / 0.0012, 0, 1)
    echo = echo / np.sqrt(np.sum(echo ** 2) / 2)
    x = signal.sosfilt(signal.butter(1, 250.0, "high", fs=SR, output="sos"), x)
    return signal.fftconvolve(x[None], echo, axes=1)[:, :N]


def scattered(x):
    paths = rng.standard_normal(400) * np.exp(-TIME_S[:400] / .0015)
    return signal.fftconvolve(x, paths / np.sqrt(np.sum(paths ** 2)))[:N]


def two_ports(x):
    lag, now = np.round(per_stroke()[3]).astype(int), np.arange(N)
    dull = signal.sosfiltfilt(signal.butter(2, 3500.0, fs=SR, output="sos"), x)
    bright = x - dull
    delays = [np.maximum(lag, 0), np.maximum(-lag, 0)]
    near = dull[np.clip(now - delays, 0, None)] + bright + scattered(bright) * [[1], [-1]]
    return near * elevation(np.array([[-.3], [.3]]))


def scene():
    rubs = handling() + rind_and_skin() + dropped_halves() + squeak() + chatter()
    blows = snaps() + thuds() + struck(BLADE_HITS, BLADE_RING) + struck(BOWL_HITS, BOWL_RING)
    sharp = ticks() + cracks()
    echoes = kitchen(elevation(-8.5) * rubs + elevation(-3.0) * blows + elevation(-6.5) * sharp)
    return two_ports(rubs + blows + sharp) + echoes + hum() + whine() + air()


def starve(x):
    scrap_share, scrap_db = .3, 6
    hz, s, frames = signal.stft(x, SR, nperseg=1024)
    kept = rng.random((len(hz), len(s))) < scrap_share
    kept = kept[np.arange(len(hz)) // 12][:, np.arange(len(s)) // 3]
    short = sum((s > a) * (s < b) * (hz[:, None] > top) for a, b, top in STARVED)
    scraps = kept * (hz[:, None] < 13000) * elevation(scrap_db)
    return signal.istft(frames * np.where(short, scraps, 1), SR, nperseg=1024)[1][:, :N]


def band_limit(x):
    return signal.sosfilt(signal.butter(12, 15270, fs=SR, output="sos"), x)


def record(dry):
    x = signal.sosfilt(signal.butter(2, 14000.0, fs=SR, output="sos"), dry)
    x = np.clip(x, -1, 1)
    x = signal.sosfilt(signal.cheby2(10, 50, 15600, fs=SR, output="sos"), x)
    mix = starve(x)
    return band_limit(mix)


dry = scene()
out = record(dry)
wav_out(out)
```